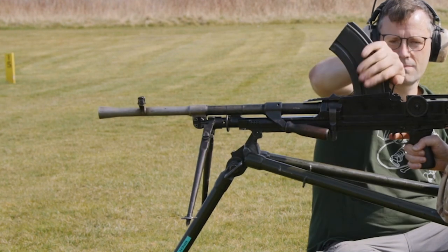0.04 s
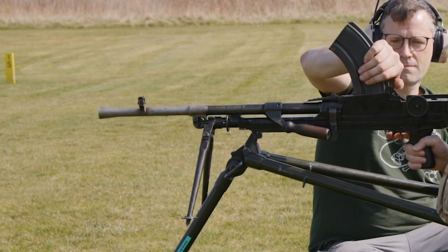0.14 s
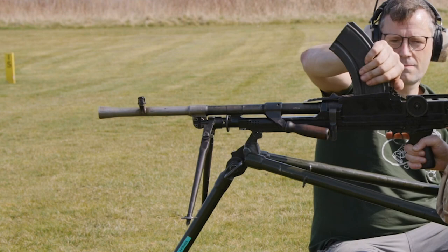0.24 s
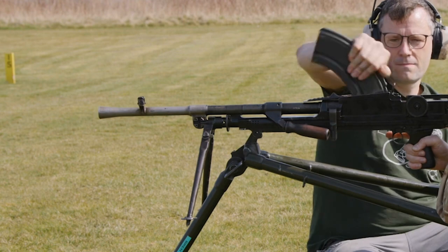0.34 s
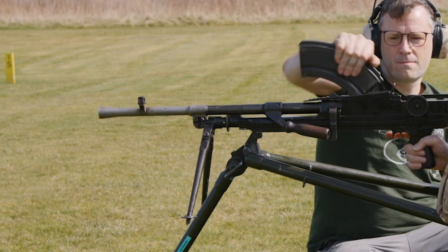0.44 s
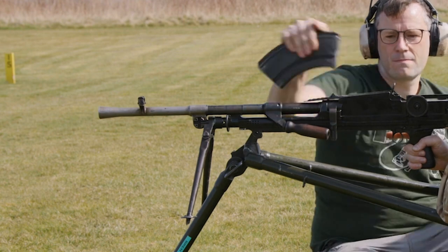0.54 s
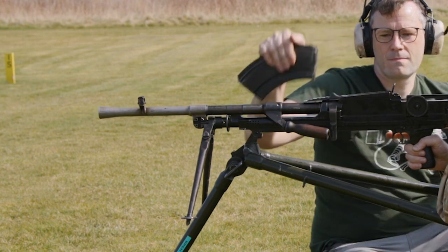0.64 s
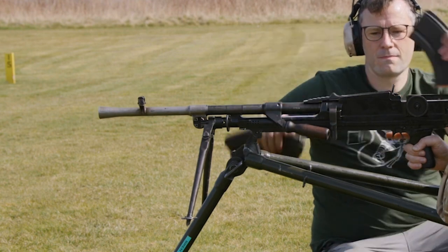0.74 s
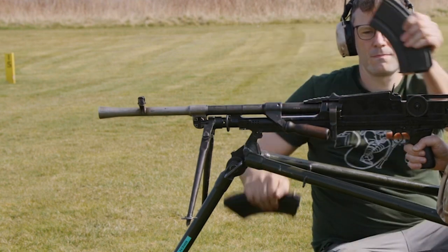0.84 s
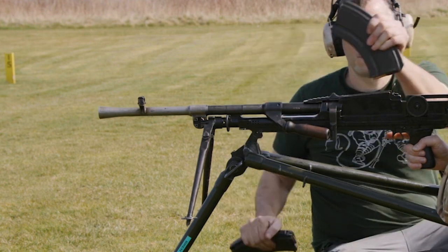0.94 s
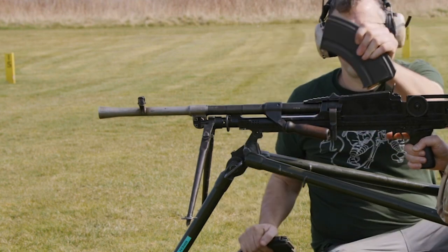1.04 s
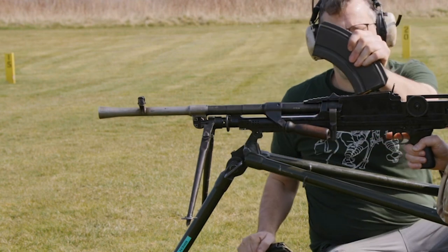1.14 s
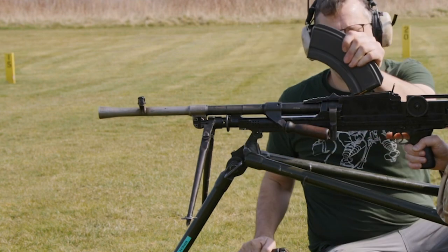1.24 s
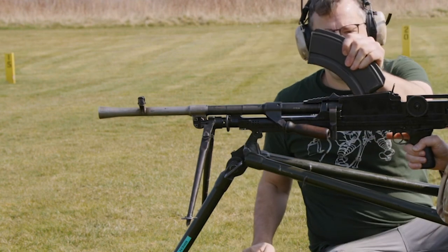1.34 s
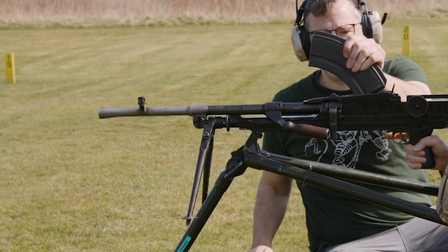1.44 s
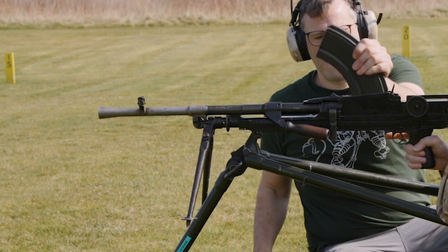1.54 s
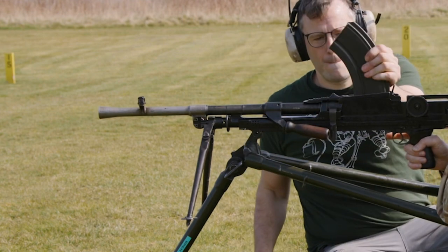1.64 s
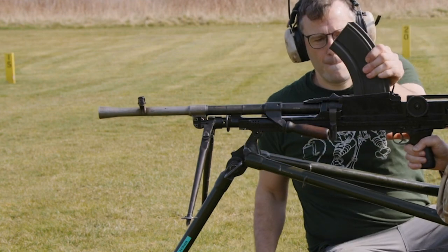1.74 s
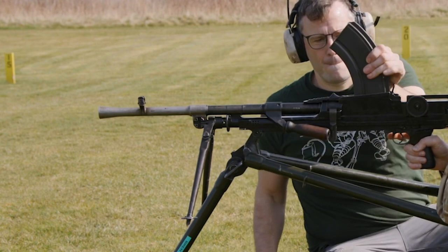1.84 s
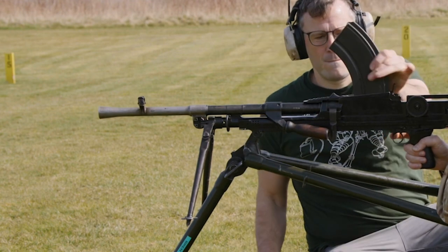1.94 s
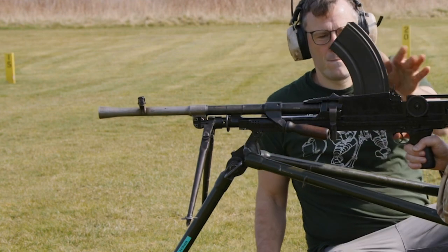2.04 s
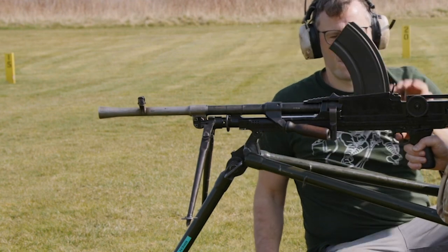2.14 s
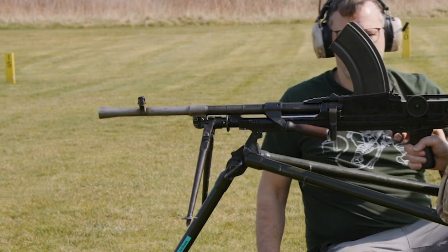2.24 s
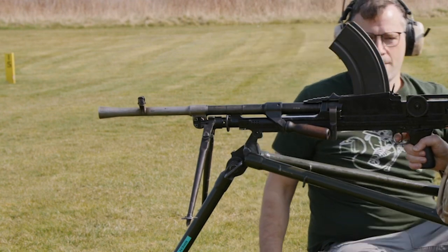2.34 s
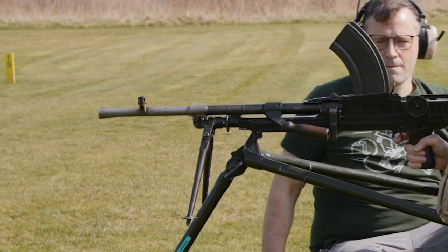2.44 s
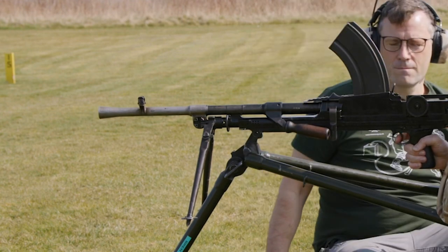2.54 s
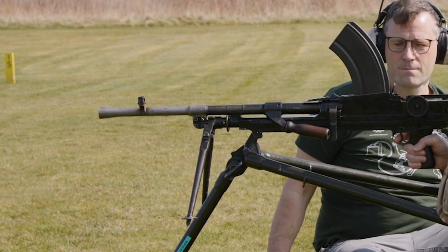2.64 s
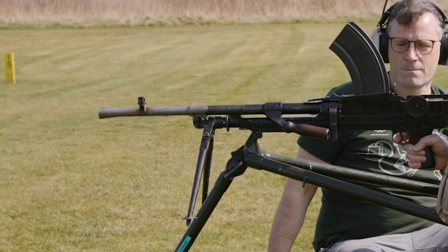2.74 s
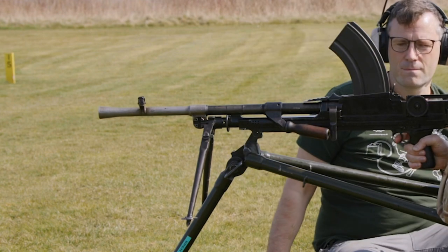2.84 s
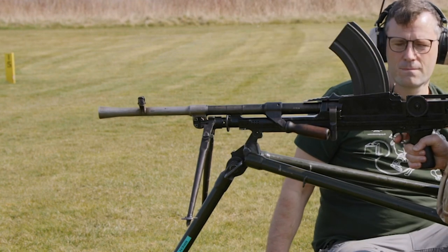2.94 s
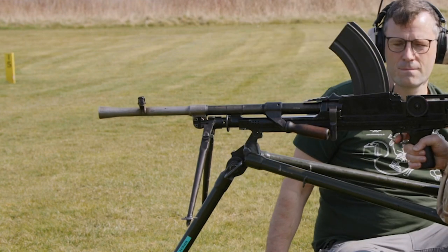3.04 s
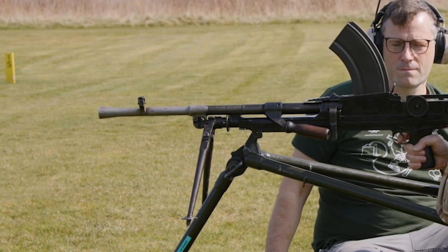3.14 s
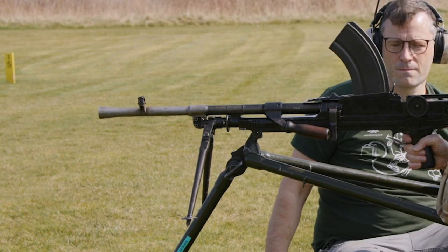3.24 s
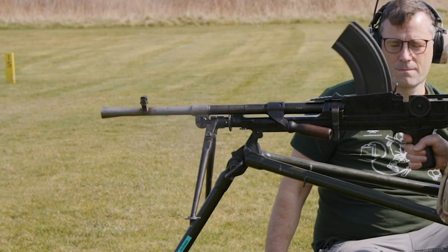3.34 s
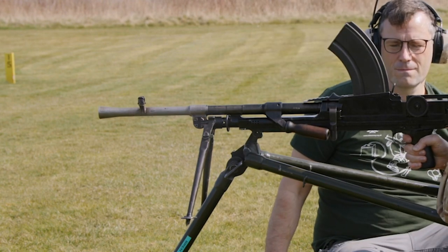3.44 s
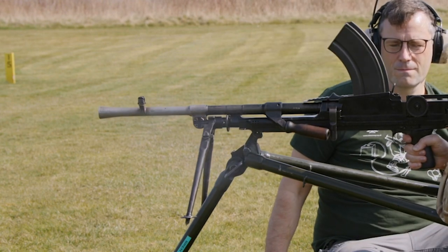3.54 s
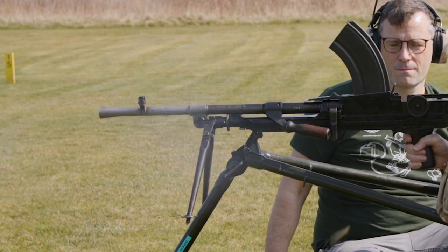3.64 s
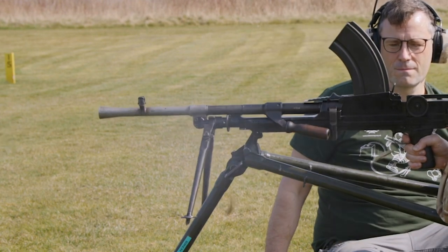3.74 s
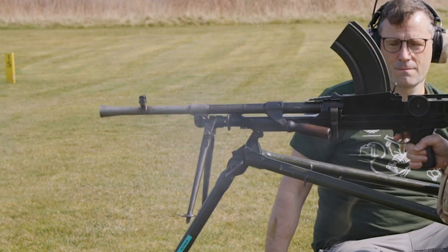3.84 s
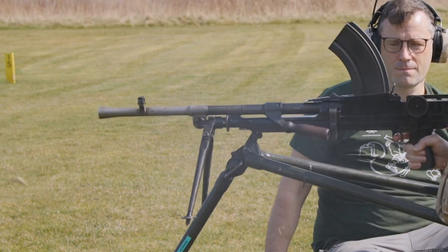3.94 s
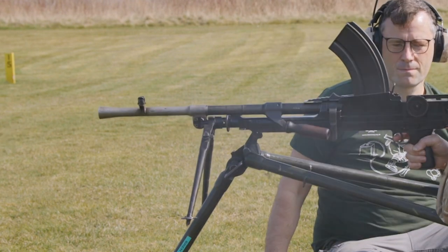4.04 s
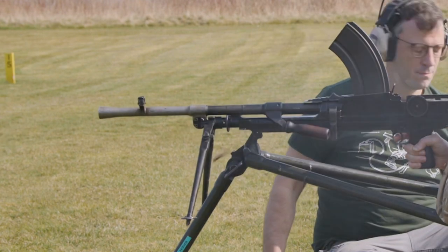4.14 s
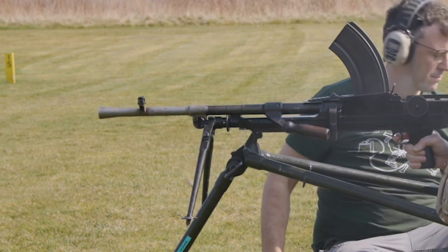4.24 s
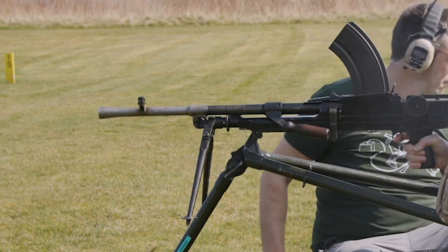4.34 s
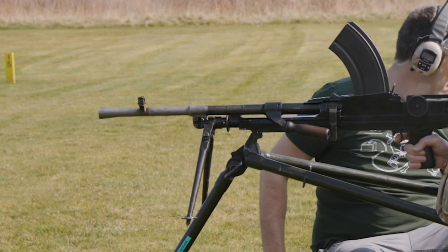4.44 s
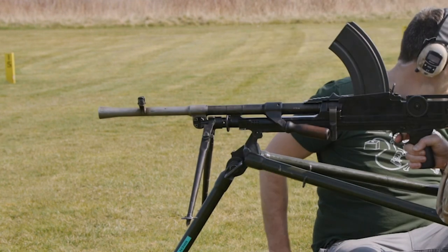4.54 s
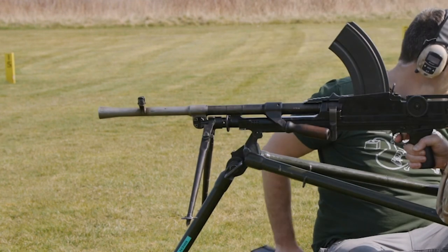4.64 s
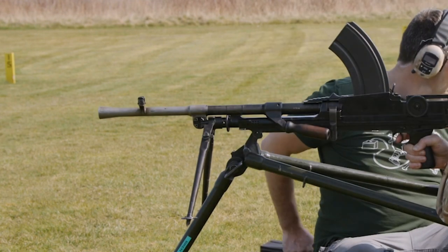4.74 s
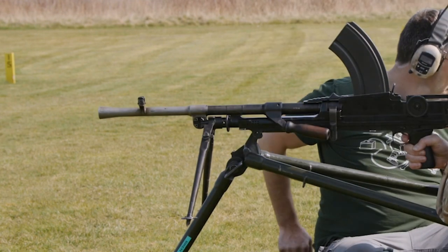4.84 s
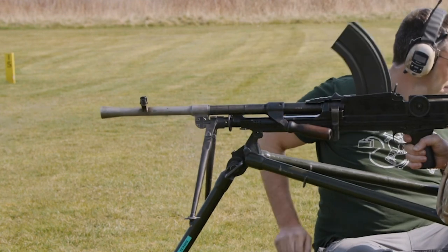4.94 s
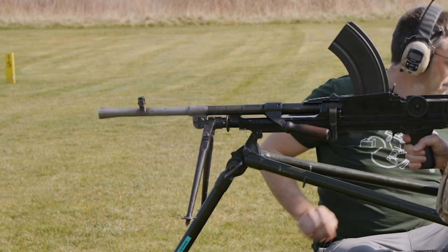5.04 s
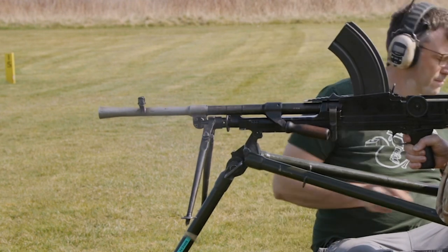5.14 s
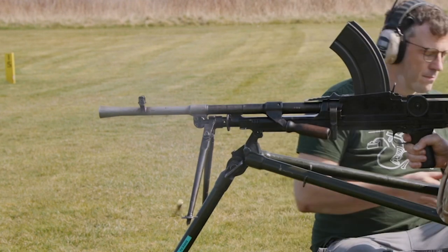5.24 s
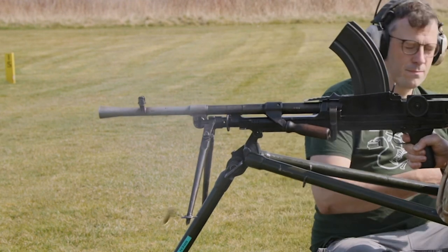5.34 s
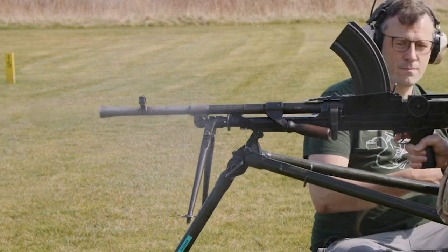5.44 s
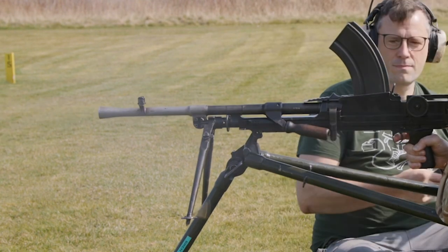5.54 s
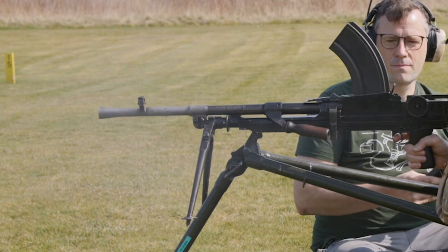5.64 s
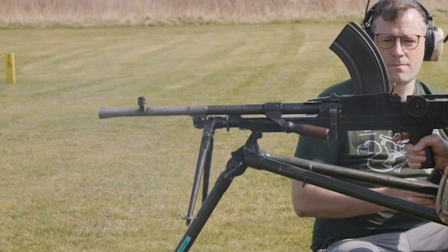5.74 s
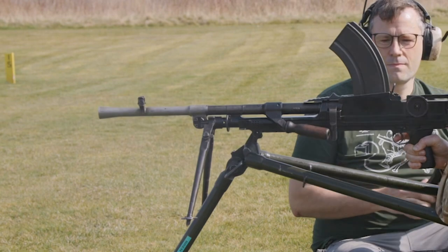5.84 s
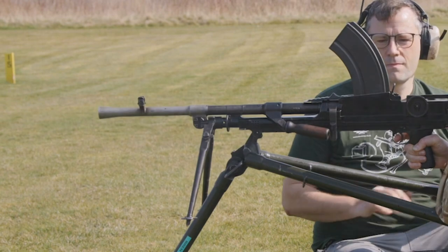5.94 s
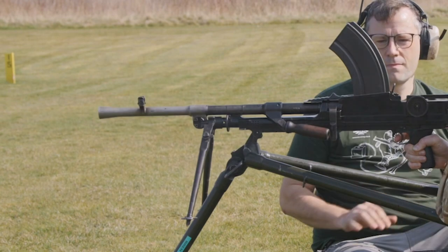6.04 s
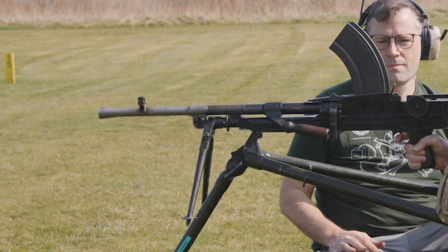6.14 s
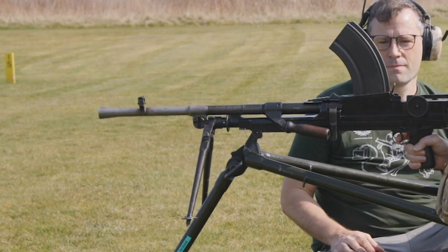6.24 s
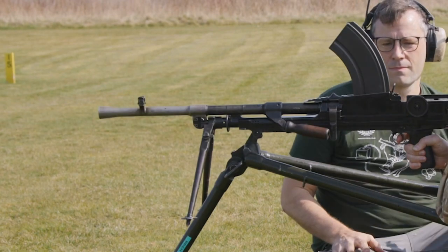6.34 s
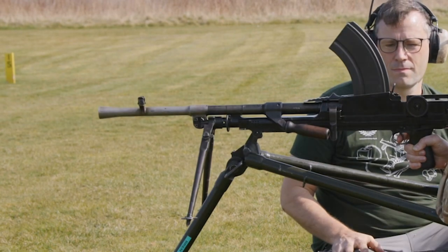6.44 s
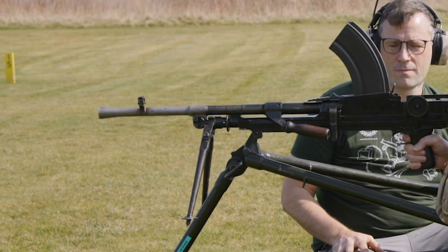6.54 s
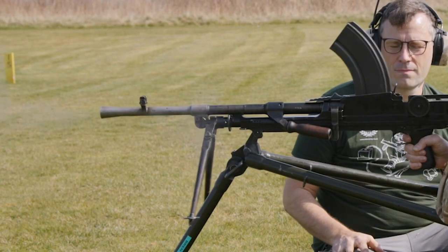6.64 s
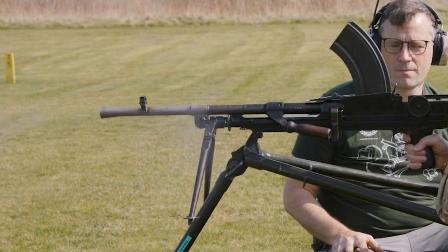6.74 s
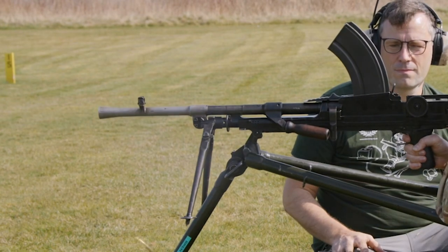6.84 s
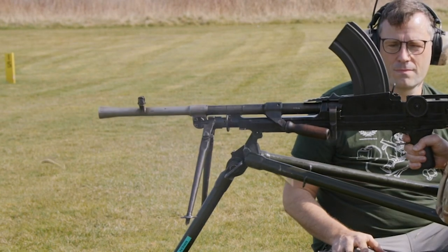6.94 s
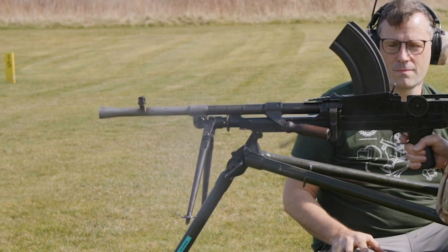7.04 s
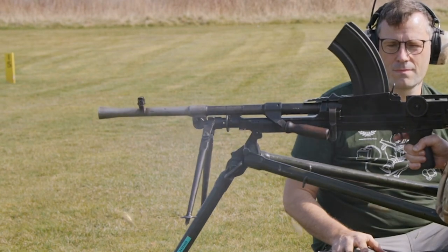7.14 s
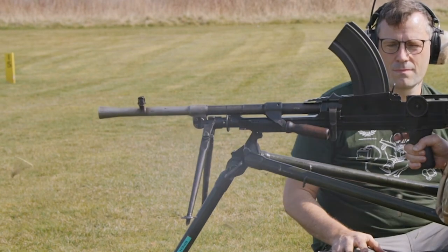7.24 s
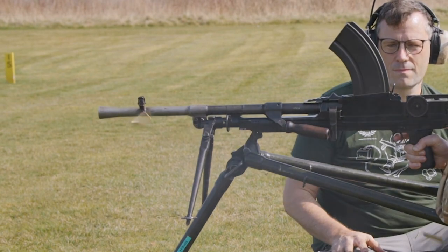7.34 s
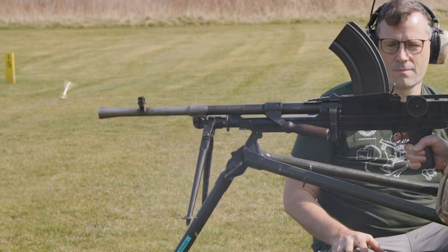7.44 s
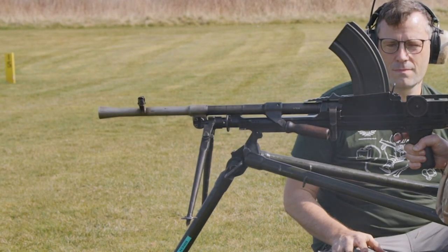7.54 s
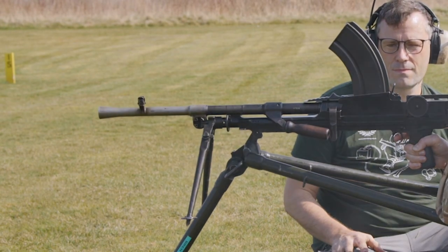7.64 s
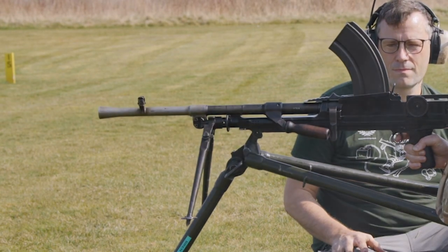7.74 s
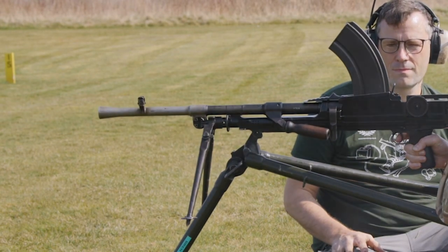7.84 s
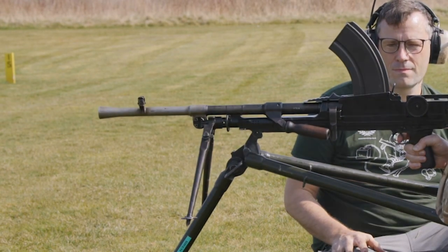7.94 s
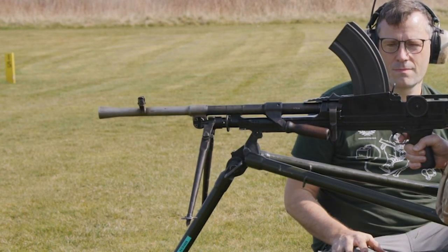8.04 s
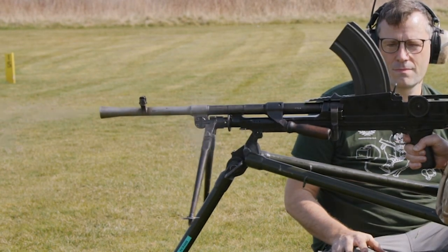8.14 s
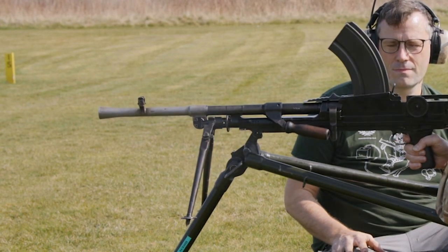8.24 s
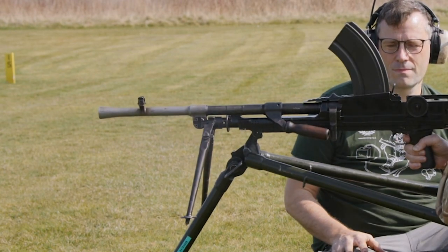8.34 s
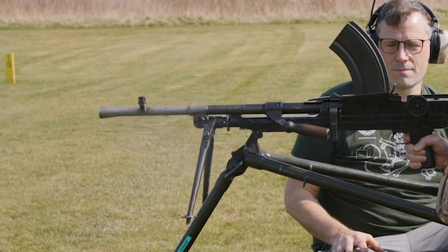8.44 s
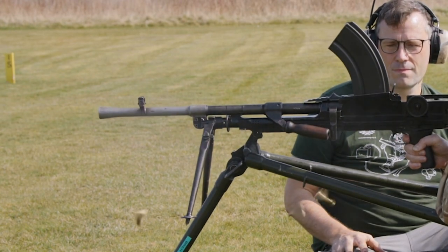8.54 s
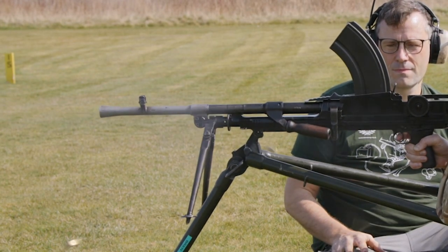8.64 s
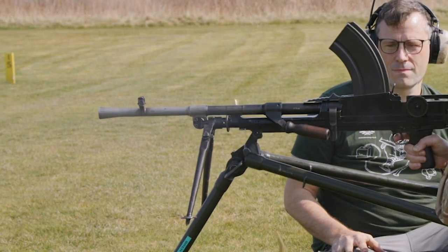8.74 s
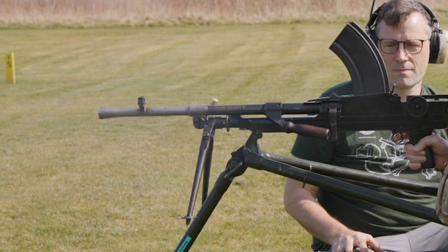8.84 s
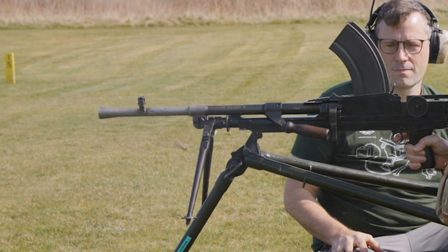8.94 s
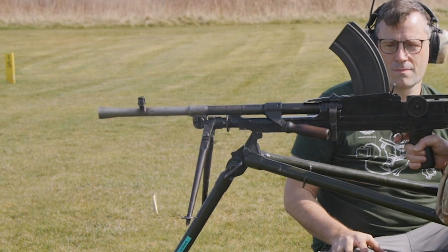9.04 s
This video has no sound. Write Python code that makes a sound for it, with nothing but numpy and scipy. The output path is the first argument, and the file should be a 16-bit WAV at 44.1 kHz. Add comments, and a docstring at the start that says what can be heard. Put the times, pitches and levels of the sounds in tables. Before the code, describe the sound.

A light machine gun is reloaded with steel knocks, then fires four short, loud bursts that echo across a breezy field.

```python
"""Light machine gun on a breezy range

Wind buffets the microphone while the magazine is changed with steel knocks and scrapes. Four five-round
bursts follow: each muzzle blast overloads the microphone and echoes round the grass range. The bolt
clatters to and fro between shots, a small spring twangs, and spent brass cases ring as they land."""
import sys
import numpy as np
from scipy import signal
from scipy.fft import irfft, next_fast_len
from scipy.io import wavfile
from scipy.ndimage import uniform_filter1d

SR = 44100
rng = np.random.default_rng(int(sys.argv[2]) if len(sys.argv) > 2 else 0)


def inscribe(sig):
    """Save sig as 16-bit PCM at rate SR to the path in sys.argv[1].

    A 1-D sig is mono; a 2-D sig holds one channel per row.
    Samples are clipped to [-1, 1] before scaling.
    """
    pcm = np.round(np.clip(np.atleast_2d(sig).T, -1, 1) * 32767)
    wavfile.write(sys.argv[1], SR, pcm.astype(np.int16))


N = 400428
TIME_S = np.arange(N) / SR


def undb(db):
    """Decibels to gain."""
    return 10 ** (np.asarray(db) / 20)


def decay(t60_s, size):
    """Exponential decay, 60 dB down at t60_s."""
    return np.exp(-np.log(1000) * TIME_S[:size] / max(t60_s, 1e-3))


def add(track, start_s, sound):
    """Mix a sound into a track."""
    i = int(np.clip(round(start_s * SR), 0, len(track)))
    track[i:i + len(sound)] += sound[:len(track) - i]


def noise(gain, size):
    """Unit-rms noise with spectral shape gain(hz)."""
    hz = np.arange(size // 2 + 1) * SR / size + 1
    x = irfft(gain(hz) * np.exp(2j * np.pi * rng.random(len(hz))), size)
    return x / x.std()


def colour(points):
    """Gain curve through (freq_hz, level_db) points."""
    hz, db = np.transpose(points)
    return lambda f: undb(np.interp(np.log(f), np.log(hz), db))


def band(centre_hz, width_hz, order=1):
    """Gain curve of a resonance; higher order, steeper skirts."""
    return lambda f: (1 + ((f * f - centre_hz ** 2) / (f * width_hz)) ** (2 * order)) ** -.5


def ring(modes, size, pitch_ratio=1, spread_db=0):
    """Damped sines with random spread in level."""
    return sum(undb(db + spread_db * rng.standard_normal()) * decay(t60_s, size)
               * np.sin(2 * np.pi * hz * pitch_ratio * TIME_S[:size]) for hz, db, t60_s in modes)


def grit(size, spread_db, hold_samples=24):
    """Uneven contact: the force jumps between random values."""
    steps = undb(spread_db * rng.standard_normal(size // hold_samples + 1))
    force = np.repeat(steps, hold_samples)[:size]
    return force / np.sqrt(np.mean(force ** 2))


# gusts at the microphone: peak_s, sigma_s, level_db
GUSTS = [(.25, 0.18, -42), (1.1, .15, -51), (1.75, 0.2, -44.5), (2.12, 0.061, -36), (2.55, 0.17, -43),
         (2.98, .25, -44), (4.55, .35, -49.5), (9.05, 0.08, -52)]
# buffeting spectrum: freq_hz, level_db
BUFFET_SPECTRUM = [(12, -35.5), (20, 4.5), (103, 0.5), (159, -3), (226, -11.5), (269, -16.5), (343, -24),
                   (500, -34.5), (650, -55), (1100, -120)]
# spectrum of the field's rush: freq_hz, level_db
RUSH_SPECTRUM = [(150, -37), (250, -17.5), (364, -14.5), (908, -11.5), (1120, -13.5), (2840, -31.5),
                 (9000, -40.5), (15000, -50.5), (19800, -120)]


def wind(calm_db=-58, calm_rush_db=-64.5, rush_follow=.38, smooth_s=0.46):
    """Gusts buffet the microphone; the soft rush of the field follows them sluggishly."""
    gusts = (undb(db) * np.exp(-((TIME_S - peak_s) / sigma_s) ** 2 / 2) for peak_s, sigma_s, db in GUSTS)
    gust_db = 10 * np.log10(undb(calm_db) ** 2 + sum(gust ** 2 for gust in gusts))
    rush_db = calm_rush_db + rush_follow * uniform_filter1d(gust_db - calm_db, int(smooth_s * SR))
    size = next_fast_len(N)
    flutter_db = 3.7 * noise(band(5.5, 13, order=2), size)[:N]
    buffet = noise(colour(BUFFET_SPECTRUM), size)[:N] * undb(gust_db + flutter_db)
    rush = noise(colour(RUSH_SPECTRUM), size)[:N] * undb(rush_db)
    return buffet + rush


# receiver and magazine modes: pitch_hz, level_db, t60_s
STEEL_MODES = [(705, -11.5, 0.065), (992, -5.5, 0.069), (1297, -18.5, 0.043), (1506, -16.5, 0.055),
               (1773, -10, 0.082), (1874, -6.5, 0.024), (2475, -5, 0.034), (3470, -10, 0.051),
               (3700, -23, 0.036), (4870, -7.5, 0.06), (5060, -16.5, 0.064), (6170, -1.5, 0.015),
               (7700, -7, 0.015)]


def clack(level_db, low_db, treble_db, t60_s, size=12000):
    """Steel on steel: contact chatter, receiver ring and faint ground scatter."""
    chatter = (noise(band(3400, 3900, order=3), size)
               + undb(low_db) * noise(band(880, 1100, order=4), size)
               + undb(treble_db) * noise(band(6900, 6900, order=2), size))
    hardness_db = [low_db, 0, treble_db]  # hard contacts favour high modes
    modes = [(hz, db + np.interp(hz, [1100, 2500, 7000], hardness_db), mode_t60_s)
             for hz, db, mode_t60_s in STEEL_MODES]
    body = ring(modes, size, pitch_ratio=1 + 0.0043 * rng.standard_normal(), spread_db=4.5)
    seating = 1 - 0.64 * decay(0.015, size)  # the faces take a moment to meet
    contacts = grit(size, spread_db=3.5) * seating * decay(t60_s, size)
    scatter = undb(-37) * decay(.17, size)
    sound = undb(level_db) * (undb(0.5) * chatter * (contacts + scatter) + undb(-5) * body)
    # small parts radiate no bass
    return signal.sosfilt(signal.butter(4, 430, "high", fs=SR, output="sos"), sound)


# magazine and catch knocks: start_s, level_db, low_db, treble_db, t60_s
MAGAZINE_KNOCKS = [(0.0815, -54.5, 14.5, -23, 0.046), (0.3062, -23, 1, -10, 0.02),
                   (0.3318, -16.5, -33, 6.5, 0.015), (0.4561, -52, 19.5, -29, 0.062),
                   (0.483, -39.5, 7.5, -43, 0.039), (1.0899, -19, 3, -15, 0.032),
                   (1.1905, -24, -1, -9, 0.047), (1.1966, -18, -22, -16, 0.027),
                   (1.253, -38, 4, -18, 0.031), (1.3178, -39, 9, -17, 0.029),
                   (1.3372, -39.5, 3.5, -13.5, 0.12), (1.474, -24, 6, -26, 0.027),
                   (1.4862, -27, 2, -10, 0.047), (1.6123, -30.5, 0, -8, 0.05),
                   (1.6307, -19.5, -6.5, 1.5, 0.029), (1.747, -40.5, 0, -16, 0.025),
                   (1.869, -38.5, 10.5, -27, 0.043)]


def magazine_knocks():
    """The empty magazine is rocked out and a full one latched in."""
    out = np.zeros(N)
    for start_s, *knock in MAGAZINE_KNOCKS:
        add(out, start_s, clack(*knock))
    return out


def scrape(length_s, level_db):
    """Gritty friction swells and fades, ringing the hollow receiver."""
    size = int(length_s * SR)
    rasp = noise(band(3000, 5500, order=2), size) * grit(size, spread_db=5)
    hollow = noise(band(640, 160), size) + .7 * noise(band(900, 300), size)
    return undb(level_db) * (rasp + undb(-1) * hollow) * signal.windows.tukey(size, .5)


# magazine travel in its well: start_s, end_s, level_db
MAGAZINE_SLIDES = [(0.261, 0.488, -66), (1.097, 1.272, -60), (1.31, 1.427, -67.5), (1.502, 1.791, -62.5),
                   (1.855, 2.05, -70)]


def magazine_slides(rattle_gap_s=.033, rattle_over_db=16.5, spread_db=3):
    """The sliding magazine rattles and scrapes."""
    out = np.zeros(N)
    for start_s, end_s, db in MAGAZINE_SLIDES:
        for slot_s in np.arange(start_s, end_s - rattle_gap_s / 2, rattle_gap_s):
            knock_db = db + rattle_over_db + spread_db * rng.standard_normal()
            knock_s = slot_s + rattle_gap_s * rng.random()
            add(out, knock_s, clack(knock_db, low_db=3.5, treble_db=-14.5, t60_s=0.029))
    for start_s, end_s, db in MAGAZINE_SLIDES:
        add(out, start_s, scrape(end_s - start_s, db))
    return out


# spring twangs: start_s, level_db
TWANGS = [(.332, -52), (1.197, -62), (3.864, -32), (5.47, -38.5)]


def spring(pitch_hz=6783, t60_s=.4):
    """A small jarred spring in the receiver rings thin and pure."""
    out = np.zeros(N)
    for start_s, db in TWANGS:
        add(out, start_s, ring([(pitch_hz, db, t60_s)], size=24000))
    return out


# one burst a row: shot1_s, shot2_s, shot3_s, shot4_s, shot5_s
BURSTS = [(3.3543, 3.4729, 3.5831, 3.6943, 3.8057), (4.9560, 5.0744, 5.1879, 5.3016, 5.4127),
          (6.6415, 6.7573, 6.8676, 6.9785, 7.0880), (8.1616, 8.2756, 8.3860, 8.4962, 8.6050)]
# bolt release, sear catch and breeze lift of the echoes, per burst: release_s, jolt_db, catch_db, lift_db
BURST_SETTINGS = [(3.2276, 14, -14, 5.5), (4.8524, 3, -11.5, -2), (6.543, 3.5, -13.5, -3.5),
                  (8.0687, -9, -14, -5)]
# first run (release, rebound, rails, feed, lock): run_fraction, level_db, low_db, treble_db, t60_s
BOLT_RUN = [(0, -26.5, -8, 0, .035), (.14, -20.5, -1.5, -11.5, .036), (0.469, -25.5, 4, -8, .058),
            (.625, -16, -2, -3.5, .033), (0.871, -9.5, -8.5, 0.5, .027)]
# strokes between shots, rear stop to lock: cycle_fraction, level_db, low_db, treble_db, t60_s
BOLT_CYCLE = [(.28, -15, -13.5, -7.5, .07), (0.561, -21.5, 0.5, -2.5, 0.046), (0.729, -18.5, -1, -8, .04),
              (.87, -21.5, -12, 8, .03), (.915, -8.5, -11, -3.5, 0.018)]


def bolt(rail_lead_s=.018, throw_s=.025, catch_s=.057):
    """The bolt scrapes forward on its rails, cycles between shots and stops on the sear."""
    out = np.zeros(N)
    for shots_s, (release_s, *_) in zip(BURSTS, BURST_SETTINGS):
        start_s = release_s - rail_lead_s
        add(out, start_s, scrape(shots_s[0] - start_s, level_db=-37))
    for shots_s, (release_s, jolt_db, catch_db, _) in zip(BURSTS, BURST_SETTINGS):
        run_s = shots_s[0] - release_s
        for fraction, db, *tone in BOLT_RUN:
            add(out, release_s + fraction * run_s, clack(db + jolt_db * (1 - fraction), *tone))
        for shot_s, cycle_s in zip(shots_s, np.diff(shots_s)):
            for fraction, db, *tone in BOLT_CYCLE:
                slack_s = .007 * (1 - fraction) * rng.standard_normal()  # tightest at lock-up
                stroke_db = db + 3.6 * rng.standard_normal()
                add(out, shot_s + fraction * cycle_s + slack_s, clack(stroke_db, *tone))
        # last round: rear stop, then sear
        add(out, shots_s[-1] + throw_s, clack(*BOLT_CYCLE[0][1:]))
        add(out, shots_s[-1] + catch_s, clack(catch_db, low_db=-5, treble_db=-0.5, t60_s=0.037))
    return out


# muzzle gas spectrum: freq_hz, level_db
GAS_SPECTRUM = [(30, -33.5), (80, -5.5), (160, 4), (400, 0.5), (800, -1.5), (1500, -2.5), (3000, -5.5),
                (7000, -9), (16000, -19.5)]
# direct shock, then reflections off ground and gear: delay_s, level_db
SHOCKS = [(0, -1.5), (.0043, 2), (.0091, -3), (.014, -13), (0.019, -16)]


def muzzle_blast(positive_phase_s=0.0011, size=8192):
    """A pressure jump and its suction, repeated by near reflections, over roaring gas."""
    age = TIME_S[:size] / positive_phase_s
    shock = (1 - age) * np.exp(-age)
    out = undb(1) * noise(colour(GAS_SPECTRUM), size) * decay(0.054, size)
    for delay_s, db in SHOCKS:
        add(out, delay_s, undb(db) * shock)
    return out


def slap(delay_s, t60_s, centre_hz, width_hz, size=8192):
    """One echo; distance dulls its treble and blurs its attack."""
    air_loss_db = 58 * delay_s  # at 10 kHz
    sound = noise(lambda f: band(centre_hz, width_hz)(f) * undb(-air_loss_db * (f / 1e4) ** 2), size)
    attack = 1 - decay(0.11 * delay_s, size)
    return sound * attack * decay(t60_s, size)


# grass and reed scatter: freq_hz, level_db
SCATTER_SPECTRUM = [(40, -3), (120, -2), (240, 1.5), (350, 15), (520, -11), (1000, -1), (2200, -7.5),
                    (5000, -5.5), (9000, -7.5), (16000, -49)]
# soft echoes off reeds and hedges: delay_s, level_db
BANKS = [(.108, -26), (.165, -47), (.272, -43), (.386, -43.5), (.498, -32.5), (.815, -44.5)]
# sharp echoes off single objects: delay_s, level_db, t60_s, centre_hz, width_hz
REFLECTORS = [(.025, -10, 0.027, 1500, 3000), (0.0601, -7.5, 0.012, 1920, 1300),
              (.0808, -4.5, 0.0059, 3955, 7000), (.095, -18, 0.02, 3040, 4970),
              (0.1257, -10.5, 0.0066, 2400, 1104), (0.291, -30, .012, 3580, 4880),
              (.402, -20, .013, 4000, 4500)]


def echoes(ground_s=.042, mirror_db=7, size=40000):
    """Dense scatter, a low ground return, soft echoes off banks and slaps off objects."""
    out = undb(-20) * noise(colour(SCATTER_SPECTRUM), size) * decay(0.32, size)
    add(out, ground_s, undb(-25) * slap(ground_s, t60_s=.24, centre_hz=275, width_hz=150))
    for delay_s, db in BANKS:
        add(out, delay_s, undb(db) * slap(delay_s, t60_s=0.084, centre_hz=2450, width_hz=1500))
    t = TIME_S[:2048]
    for delay_s, db, t60_s, centre_hz, width_hz in REFLECTORS:
        add(out, delay_s, undb(db) * slap(delay_s, t60_s, centre_hz, width_hz))
        # flat, near objects also mirror the shock as a crack
        crack = np.exp(-np.pi * width_hz / 2 * t) * np.sin(2 * np.pi * centre_hz * t)
        mirror_gain = undb(db + mirror_db) * np.exp(-t60_s / 0.028 - delay_s / .4)
        add(out, delay_s, mirror_gain * crack)
    return out


# spectrum of the rolling report: freq_hz, level_db
ROLL_SPECTRUM = [(40, -8.5), (170, 11.5), (350, -4), (600, -3.5), (1000, -2.5), (1800, -0.5), (3000, -8.5),
                 (5000, -3.5), (9000, -23.5), (16000, -37.5)]


def far_roll(size=98304):
    """The report swells and rolls over the field; the far edge answers longest."""
    field = noise(colour(ROLL_SPECTRUM), size) * decay(1.02, size) * (1 - decay(0.5, size))
    far_edge = noise(band(2100, 1600, order=3), size) * decay(3.01, size) * (1 - decay(1.2, size))
    return undb(-30.5) * field + undb(-48) * far_edge


# firing point resonances: pitch_hz, level_db, t60_s
BOOM_MODES = [(89, -15, 0.058), (111.5, -6.5, 0.048), (183.5, -28.5, 0.49), (235.4, -38.5, 0.78),
              (292, -35, 0.4), (367.3, -27, 0.35), (449, -26, 0.26), (543, -13.5, 0.076),
              (570.3, -14.5, 0.11), (659.5, -16, 0.11), (734, -15, 0.079), (950, -18.5, .1),
              (1033, -23.5, 0.16)]


def gunfire(blast_mix_rad=0.67, echo_mix_rad=.55, lift_share=.7, lift_onset_s=0.065):
    """Near-identical shots: turbulence varies part of each, and the breeze bends the longer paths."""
    out = np.zeros(N)
    common_blast, common_echoes = muzzle_blast(), echoes()
    boom = ring(BOOM_MODES, size=16384)
    ground_delay_s = SHOCKS[1][0]
    path_s = TIME_S[:len(common_echoes)]
    echo_lift = lift_share * (1 - np.exp(-(path_s / lift_onset_s) ** 4))
    for shots_s, (*_, lift_db) in zip(BURSTS, BURST_SETTINGS):
        for shot_s in shots_s:
            blast = np.cos(blast_mix_rad) * common_blast + np.sin(blast_mix_rad) * muzzle_blast()
            returns = np.cos(echo_mix_rad) * common_echoes + np.sin(echo_mix_rad) * echoes()
            add(out, shot_s, blast)
            add(out, shot_s, undb(lift_db * echo_lift) * returns)
            add(out, shot_s + ground_delay_s, boom)
            add(out, shot_s, undb(lift_db) * far_roll())
    return out


# case landings: start_s, level_db, pitch_ratio, tick_relative_db
LANDINGS = [(4.035, -34, 1.003, 16), (4.249, -37, .998, -10), (4.263, -34, .998, -12),
            (5.508, -37, .996, -12), (7.323, -37, 1.006, -15), (8.675, -36, .995, -11),
            (8.884, -48, 1.0, -4), (8.934, -44, 1.005, -6)]
# brass case modes: pitch_hz, level_db, t60_s
BRASS_MODES = [(7560, -14, .21), (10300, -13, .25), (11050, -17, .36), (11150, -11, .3), (11120, 0, .19),
               (15720, -21, .18)]


def cases():
    """Spent brass lands with a tick; its close modes beat as it rings."""
    out = np.zeros(N)
    for start_s, db, pitch_ratio, tick_relative_db in LANDINGS:
        tick = noise(band(5300, 5000), size=4096) * decay(0.026, size=4096)
        add(out, start_s, undb(db) * ring(BRASS_MODES, size=20000, pitch_ratio=pitch_ratio, spread_db=3))
        add(out, start_s, undb(db + tick_relative_db) * tick)
    return out


def scene():
    """All sources at one microphone."""
    return (magazine_knocks() + magazine_slides() + bolt() + spring() + gunfire() + cases() + wind())[None]


def record(dry, clip_low=-0.44, clip_high=0.36, coupling_hz=32, top_hz=15900):
    """The input stage clips flat, its coupling capacitor droops the flats, and the top is cut."""
    clipped = np.clip(dry, clip_low, clip_high)
    drooped = signal.sosfilt(signal.butter(1, coupling_hz, "high", fs=SR, output="sos"), clipped)
    return signal.sosfilt(signal.ellip(10, .2, 70, top_hz, fs=SR, output="sos"), drooped)


dry = scene()
out = record(dry)
inscribe(out)
```